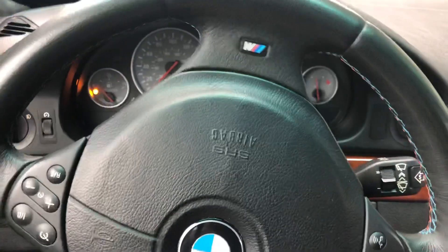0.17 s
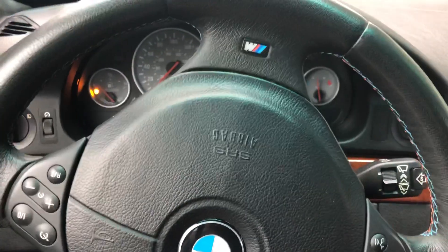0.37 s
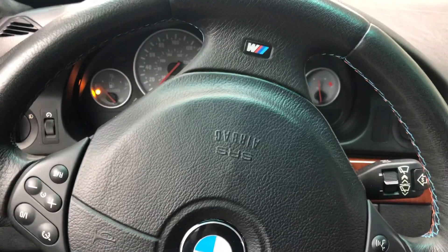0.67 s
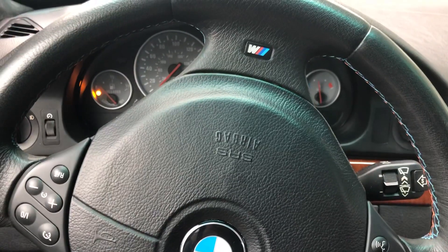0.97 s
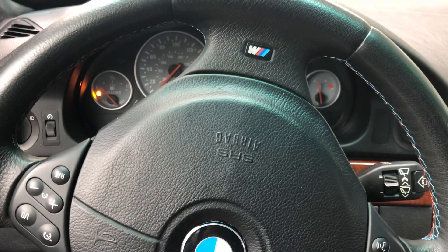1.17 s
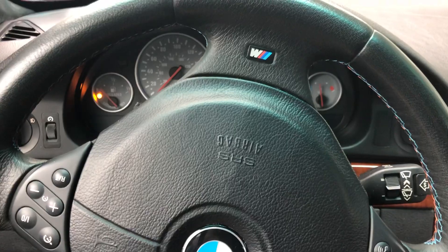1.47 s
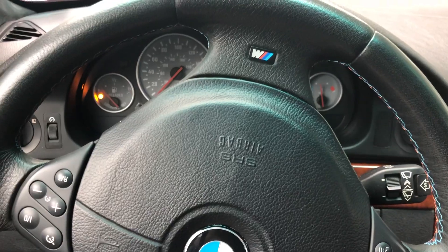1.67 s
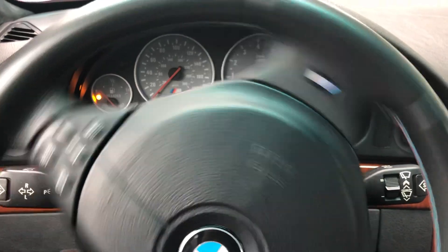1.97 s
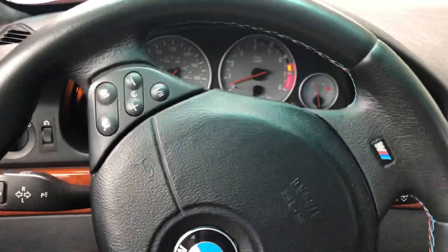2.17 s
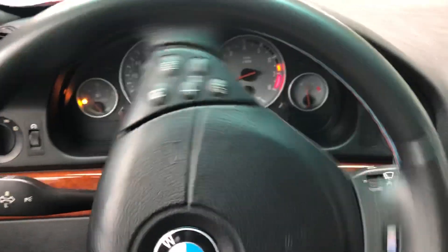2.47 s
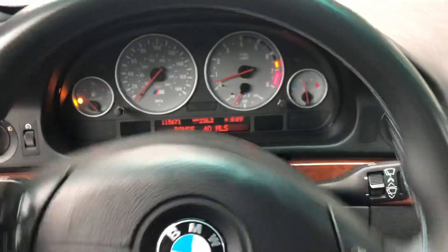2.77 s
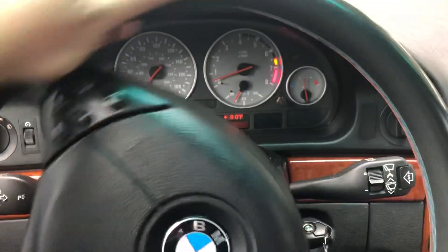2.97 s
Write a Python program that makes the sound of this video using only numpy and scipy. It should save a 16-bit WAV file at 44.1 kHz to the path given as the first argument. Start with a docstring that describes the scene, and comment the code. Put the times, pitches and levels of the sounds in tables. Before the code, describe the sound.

A power-steering pump hums over low idling-engine boom and cabin rumble, rising slightly in pitch with leather swishes until 0.4 s. From 0.4 to 2 s it holds at full lock, a steady thin whine with faint valve hiss and dull bumps. A sharp plastic click at 1.93 s, oil gurgles around 2.1 s, then hands rub as the hum peaks in pitch near 2.5 s and sinks, loud and smooth, to the end. Close, dry mono.

```python
"""A power-steering hum rises in pitch and hands swish on leather, inside the cabin of an idling car.
The wheel is turned to full lock, held there, then spun back, heard in mono from the driver's seat.
The pump whines on sine overtones that shift with its load, over filtered noise for oil flow and relief valve.
The engine booms on two sines over cabin rumble; the steering bumps dully in swells of low noise.
The column clicks once as the wheel leaves the lock, then the oil gurgles in rough gliding tones."""
import sys
import numpy as np
from scipy.fft import rfft, irfft, next_fast_len
from scipy.io import wavfile
from scipy.ndimage import map_coordinates

SR = 44100
rng = np.random.default_rng(int(sys.argv[2]) if len(sys.argv) > 2 else 0)


def put_to_file(sound):
    """Save the sound as 16-bit audio at rate SR, in the file named by the first command-line argument."""
    columns = np.atleast_2d(sound).T  # one column per channel
    safe = np.clip(columns, -1, 1)
    whole_steps = np.round(safe * 32767)
    wavfile.write(sys.argv[1], SR, whole_steps.astype(np.int16))


N = 137151
t = np.arange(N) / SR

# Spectra give relative level_db per Hz; noise() brings each to rms 1 before its own level is applied.

# engine boom in the cabin at the firing rate: time_s, level_db
BOOM = [(0, -41), (.25, -53), (.6, -41), (1.2, -42), (1.9, -41), (2.4, -39.5), (2.57, -44.5), (2.75, -41.5),
        (3.0, -48), (3.11, -54)]
# low cabin rumble: frequency_hz, level_db per Hz
RUMBLE = [(20, -37.5), (35, -21), (55, 3), (85, -2), (120, 1), (170, -2.5), (230, -11.5), (320, -20),
          (600, -62)]
# mechanical rush of the engine: frequency_hz, level_db per Hz
ENGINE_NOISE = [(120, -7.5), (250, 5), (470, 3.5), (700, -8), (1100, -5), (1450, -14), (1900, -15),
                (2300, -28.5), (3200, -26.5), (4900, -34.5), (6200, -38), (9000, -35), (12000, -39.5),
                (16000, -46)]
RUMBLE_DB, RUMBLE_SWING_DB = -46, 1.5
ENGINE_NOISE_DB, FIRING_DEPTH = -54, 0.11
VANE_PASSES_PER_FIRING = 3.02
# twice the firing rate: level, random swing and extra level at full lock, where the pump loads the engine
SECOND_ORDER_DB, SECOND_ORDER_SWING_DB, SECOND_ORDER_LOAD_DB = -51.5, 5.5, 5.5

# dull steering bumps: peak_s, level_db
BUMPS = [(.085, -44), (0.502, -48), (1.039, -43.5), (1.17, -43.5), (1.38, -42), (1.891, -39.5),
         (2.165, -38), (2.449, -43.5), (2.68, -38), (3.1, -37)]
BUMP_WIDTH_S = 0.055  # from the peak to 1/e

# hands sliding on the rim: peak_s, rise_s, fall_s, level_db, brightness_db per octave
RUBS = [(.01, 0.055, 0.078, -66, 1.5), (0.187, 0.019, 0.041, -58, -2.5), (.255, 0.031, 0.03, -64, -4),
        (1.97, .035, 0.053, -61, 0), (2.099, 0.058, 0.047, -64, -0.5), (2.24, 0.038, 0.025, -66, -1.5),
        (2.391, 0.072, 0.053, -67, 0), (2.491, 0.033, 0.1, -60.5, -0.5), (2.601, 0.054, 0.13, -60.5, -1),
        (2.919, 0.11, 0.12, -68.5, -1), (3.11, 0.028, .04, -64.5, -1)]
# hiss of skin on leather: frequency_hz, level_db per Hz
LEATHER = [(500, -8), (1300, -4), (2200, 3), (3200, 0), (4500, 2), (6500, 0.5), (9000, -2.5), (13000, -5),
           (16000, -7)]
# resonances of the rubbed rim: centre_hz, width_hz, lift_db above the hiss
RIM = [(1800, 300, 3), (2750, 300, 3.5), (3850, 300, 3.5), (4800, 500, 2.5), (6200, 500, 2), (8500, 500, 3)]
RIM_SHIFT = .02  # random shift of the resonances from slide to slide, as a share of their pitch
RUB_GRAIN_DB, RUB_JUDDER_DB = 1.3, .6

# crack of the column click: frequency_hz, level_db per Hz
CLICK_COLOUR = [(800, -24), (2000, -15), (2600, -4), (3500, 6.5), (4300, 7.5), (5200, 7.5), (6500, -1),
                (8000, -6), (11000, -4), (16000, -8.5)]
# what the snap rings with: pitch_hz, level_db, t60_s
CLICK_MODES = [(2100, -51, .014), (3600, -43, .006), (4450, -37, .006), (5300, -42, .007),
               (6400, -48, .005), (11000, -46, .003)]
CLICK_S, CLICK_DB, CLICK_T60_S = 1.9314, -44, .008
CLICK_TAIL_DB, CLICK_TAIL_T60_S = -49, .045

# oil gurgling as the pressure lets go: start_s, length_s, start_hz, glide_octaves_per_s, level_db
GURGLES = [(2.055, .05, 400, 7, -55), (2.098, .06, 840, -20, -52.5), (2.1, .075, 105, 13, -39),
           (2.115, .045, 380, 10, -53), (2.305, .065, 480, 5, -59), (2.4, .06, 420, 3, -57)]
GURGLE_ROUGH_RAD = .6

# pump speed: time_s, vane_rate_hz
PUMP = [(0, 122.4), (0.2, 128.2), (0.42, 131.5), (0.62, 135.8), (0.8, 137.4), (1.0, 137.1), (1.25, 134.9),
        (1.55, 135.1), (1.95, 132.8), (2.18, 136.1), (2.35, 143.4), (2.47, 147), (2.66, 137.3),
        (2.85, 128.1), (3.11, 119.9)]
# hum at the vane rate: time_s, level_db
HUM = [(0, -45), (0.12, -38.5), (0.27, -34.5), (0.38, -41), (0.7, -45.5), (0.88, -42), (1.22, -40),
       (1.5, -41), (1.7, -46), (1.9, -44), (2.02, -32.5), (2.12, -43.5), (2.2, -34.5), (2.37, -48.5),
       (2.47, -27), (2.6, -27), (2.74, -22.5), (2.89, -27), (3.03, -24), (3.1, -23.5)]
# octave of the hum: time_s, level_db
OCTAVE = [(0, -50.5), (0.2, -65), (0.35, -46.5), (0.75, -45.5), (1.4, -46), (1.9, -46.5), (2.15, -56),
          (2.38, -59), (2.52, -47), (2.68, -38.5), (2.8, -36.5), (2.93, -42.5), (3.05, -58.5)]
# pump overtones: multiple of the vane rate, then level_db in each of the seven load stages
OVERTONES = [(3, -59, -55, -52.5, -53, -72, -59, -58), (4, -54, -58.5, -64, -63.5, -74, -63, -59.5),
             (5, -73, -66, -71, -68.5, -80, -64.5, -65.5), (6, -78, -66, -72, -69, -78, -76, -65.5),
             (7, -67, -63, -68, -72, -80, -76, -67), (8, -68, -74, -79, -79, -82, -74, -68),
             (9, -77, -85, -73, -73, -77, -81, -74), (10, -73, -82, -83, -83, -86, -85, -81),
             (11, -77, -81, -75.5, -80, -90, -81, -77), (12, -79, -80, -79, -75.5, -88, -88, -87),
             (13, -81, -88, -76.5, -84, -84, -88, -90), (14, -88, -69.5, -73, -75.5, -88, -90, -80),
             (15, -81, -82, -79, -83, -92, -90, -95), (16, -88, -90, -84, -90, -95, -95, -95),
             (17, -89, -88, -77.5, -89, -92, -92, -92), (18, -90, -89, -85, -80.5, -95, -92, -97),
             (19, -92, -90, -82.5, -83, -95, -95, -97), (35, -98, -98, -90, -90, -99, -99, -99),
             (37, -96, -91, -87, -87, -99, -99, -99)]
# load stages turning in, meeting the stop, pressed on it, resting on it, let go, spun back, coasting: start_s
STAGE_S = [-1, .17, .42, 1.2, 2.08, 2.42, 2.66]
LET_GO, SPUN_BACK, COASTING = 4, 5, 6  # positions among the stages
LOAD_RAMP_S, LOCK_ON_S, LOCK_OFF_S = .08, .42, 2.05
VANES, SHAFT_DEPTH = 10, 0.092  # unequal vanes shake each overtone once and twice a turn
FLUTTER_DB, COASTING_FLUTTER_DB = 1.3, 1.2  # the second is added while coasting
JITTER_RAD, MOVING_JITTER_RAD = .009, .006  # the second is added off the lock
GROWL_RAD = .03
# oil flowing through the steering valve: frequency_hz, level_db per Hz
FLOW = [(200, -16.5), (500, 7), (750, 0), (1200, -3), (2000, -12), (5000, -18), (12000, -29)]
FLOW_DB = -61
FLOW_SLACK, FLOW_COAST_SLACK = .5, .25  # share of flow lost when let go and when coasting
# hiss of the relief valve at full lock: frequency_hz, level_db per Hz
RELIEF = [(500, -29), (1000, 0.5), (1450, -2.5), (1900, -8.5), (2400, -8.5), (3300, -13.5), (4900, -14.5),
          (5800, -18.5), (9000, -22), (14000, -30.5)]
RELIEF_DB, RELIEF_DEPTH = -68.5, 0.078

LOW_CUT_HZ, TOP_HZ, FADE_S = 30, 15800, .006


def amp(db):
    """Decibels to gain."""
    return 10 ** (np.asarray(db) / 20)


def along(points, hz):
    """Read (Hz, value) points on a log frequency axis."""
    f, v = np.transpose(points)
    return np.interp(np.log(hz + 1), np.log(f + 1), v)


def curve(rows):
    """One value per sample from (s, value) rows."""
    return np.interp(t, *np.transpose(rows))


def wobble(rate):
    """A smooth random curve with rate knots a second."""
    knots = rng.standard_normal(4096)
    coarse_t = t[::32]
    smooth = map_coordinates(knots, [coarse_t * rate], mode="wrap")
    return np.interp(t, coarse_t, smooth)


def filtered(x, response):
    """Shape the spectrum of x by a response of frequency."""
    m = next_fast_len(N + SR // 2)
    hz = np.fft.rfftfreq(m, 1 / SR)
    return irfft(rfft(x, m) * response(hz), m)[:N]


def noise(spectrum, resonances=()):
    """Coloured noise of rms 1, lifted at any (Hz, width Hz, dB) resonances."""
    def response(hz):
        lift_db = sum(db / (1 + (2 * (hz - centre) / width) ** 2) for centre, width, db in resonances)
        return amp(along(spectrum, hz) + lift_db)

    x = filtered(rng.standard_normal(N), response)
    return x / x.std()


def tone(phase):
    """A sine of rms 1 that starts anywhere in its cycle."""
    return np.sqrt(2) * np.sin(phase + 2 * np.pi * rng.random())


def vane_phase():
    """Radians of the pump's vane cycle, summed from its speed."""
    return 2 * np.pi * np.cumsum(curve(PUMP)) / SR


def after(s):
    """A ramp from 0 to 1 around a change of the pump's load."""
    return np.clip((t - s) / LOAD_RAMP_S + .5, 0, 1)


def lock():
    """1 while the wheel is held against its stop, 0 otherwise."""
    return after(LOCK_ON_S) * (1 - after(LOCK_OFF_S))


def engine():
    """The firing rate booms in the cabin over a rumble and a mechanical rush that pulses with the firing."""
    firing = vane_phase() / VANE_PASSES_PER_FIRING
    boom = amp(curve(BOOM)) * tone(firing)
    second_db = SECOND_ORDER_DB + SECOND_ORDER_LOAD_DB * lock() + SECOND_ORDER_SWING_DB * wobble(4.33)
    second_order = amp(second_db) * tone(2 * firing)
    rumble = amp(RUMBLE_DB + RUMBLE_SWING_DB * wobble(8.41)) * noise(RUMBLE)
    rush = amp(ENGINE_NOISE_DB) * (1 + FIRING_DEPTH * tone(firing)) * noise(ENGINE_NOISE)
    return boom + second_order + rumble + rush


def bumps():
    """The steering's dull bumps are short bell-shaped swells of low rumble."""
    swells = sum(amp(db) * np.exp(-((t - s) / BUMP_WIDTH_S) ** 2) for s, db in BUMPS)
    return swells * noise(RUMBLE)


def hands():
    """Each slide over the leather swells and fades with a fine grain, a judder and its own colour."""
    sound = np.zeros(N)
    for s, rise, fall, db, tilt_db in RUBS:
        swell = np.exp(-((t - s) / np.where(t < s, rise, fall)) ** 2 / 2)
        grip = 1 + RIM_SHIFT * rng.standard_normal()
        hiss = [(hz, level + tilt_db * np.log2(hz)) for hz, level in LEATHER]
        rim = [(hz * grip, width, lift) for hz, width, lift in RIM]
        sound += amp(db) * swell * noise(hiss, rim)
    return sound * amp(RUB_GRAIN_DB * wobble(200) + RUB_JUDDER_DB * wobble(45))


def click():
    """A plastic snap in the column: a crack of noise, a few brief modes and a short cabin echo."""
    age = np.maximum(t - CLICK_S, 0)
    crack = amp(CLICK_DB - 60 * age / CLICK_T60_S)
    echo = amp(CLICK_TAIL_DB - 60 * age / CLICK_TAIL_T60_S)  # slower decay of the same noise
    ring = sum(amp(db - 60 * age / t60) * np.sin(2 * np.pi * hz * age) for hz, db, t60 in CLICK_MODES)
    return ring + (t > CLICK_S) * (crack + echo) * noise(CLICK_COLOUR)


def gurgles():
    """Oil gurgles in quick pitch glides, roughened by random phase, as the wheel leaves its stop."""
    sound = np.zeros(N)
    for s, length, start_hz, glide, db in GURGLES:
        age = np.clip(t - s, 0, length)
        phase = 2 * np.pi * np.cumsum(start_hz * 2 ** (glide * age)) / SR
        swell = np.sin(np.pi * age / length) ** 2
        sound += amp(db) * swell * tone(phase + GURGLE_ROUGH_RAD * wobble(150))
    return sound


def pump():
    """Vane pressure ripple makes a hum, its octave and load-dependent overtones, over rushing oil."""
    held = lock()
    moving = 1 - held
    begun = np.array([after(s) for s in STAGE_S])
    stages = -np.diff(begun, axis=0, append=0)  # each stage fades out as the next begins
    coasting = stages[COASTING]

    phase = vane_phase() + (JITTER_RAD + MOVING_JITTER_RAD * moving) * wobble(30)
    whine = amp(curve(HUM)) * tone(phase) + amp(curve(OCTAVE)) * tone(2 * phase)
    growl = GROWL_RAD * stages[SPUN_BACK] * wobble(90)
    for k, *stage_db in OVERTONES:
        level = amp(stage_db) @ stages
        shake = 1 + SHAFT_DEPTH * (tone(phase / VANES) + tone(2 * phase / VANES))
        flutter = amp((FLUTTER_DB + COASTING_FLUTTER_DB * coasting) * wobble(12))
        whine = whine + level * shake * flutter * tone(k * (phase + growl))

    flow_gain = moving * (1 - FLOW_SLACK * stages[LET_GO] - FLOW_COAST_SLACK * coasting)
    flow = amp(FLOW_DB) * flow_gain * noise(FLOW)
    # the relief valve's hiss pulses with the vanes
    relief = amp(RELIEF_DB) * held * (1 + RELIEF_DEPTH * tone(phase)) * noise(RELIEF)
    return whine + flow + relief


def scene():
    """Everything as heard from the driver's seat, in one channel."""
    return (engine() + bumps() + hands() + click() + gurgles() + pump())[None]


def record(dry):
    """The recorder drops the deepest bass and everything above its band limit; both ends fade briefly."""
    def response(hz):
        low_cut = 1 - 1 / (1 + (hz / LOW_CUT_HZ) ** 10)
        return (hz < TOP_HZ) * low_cut

    fade = np.clip(np.minimum(t, t[-1] - t) / FADE_S, 0, 1)
    return fade * filtered(fade * dry[0], response)[None]


dry = scene()
out = record(dry)
put_to_file(out)
```